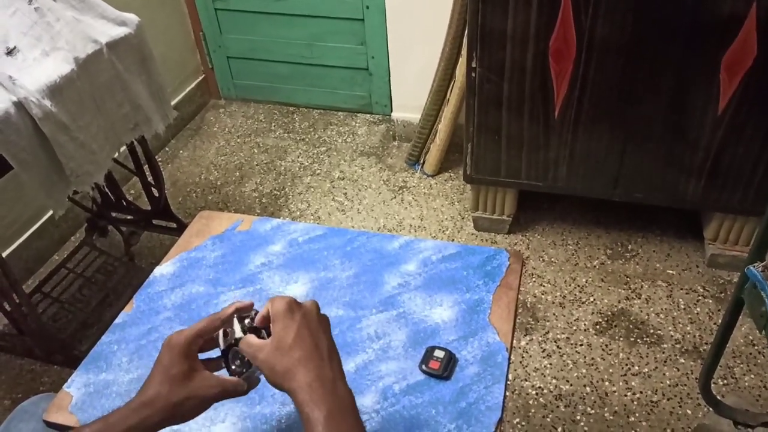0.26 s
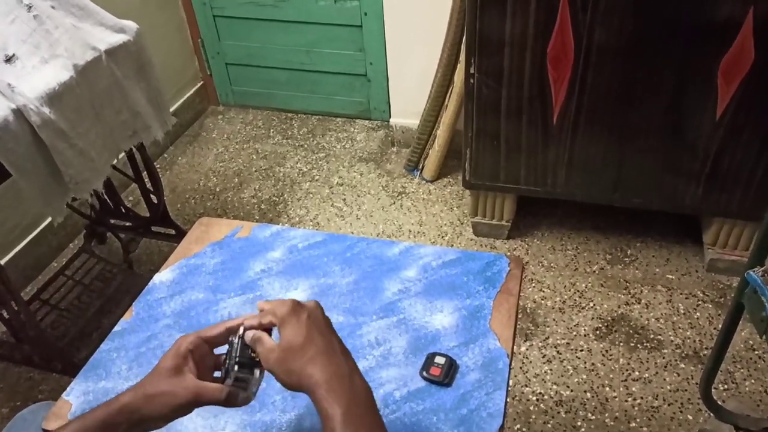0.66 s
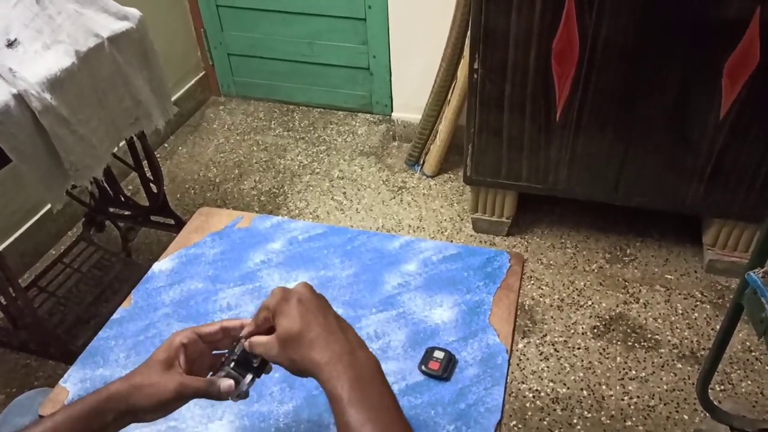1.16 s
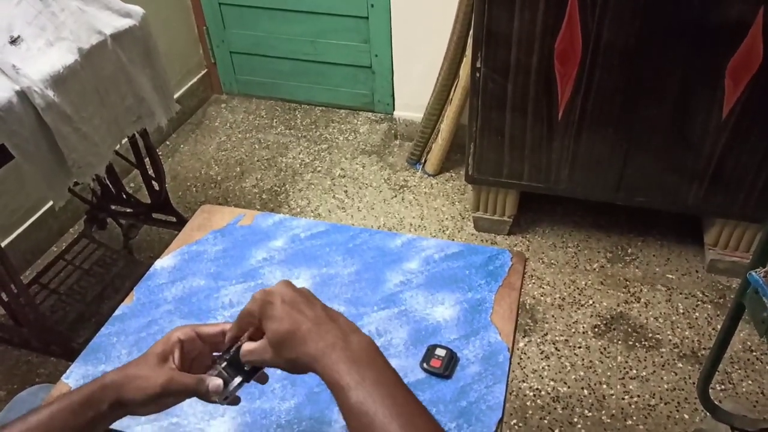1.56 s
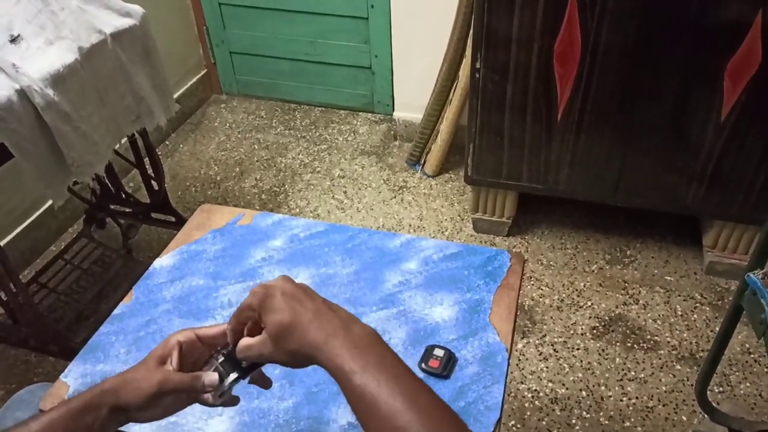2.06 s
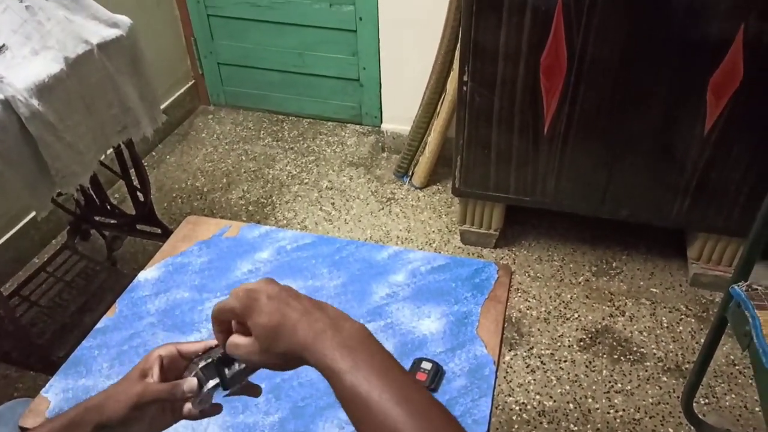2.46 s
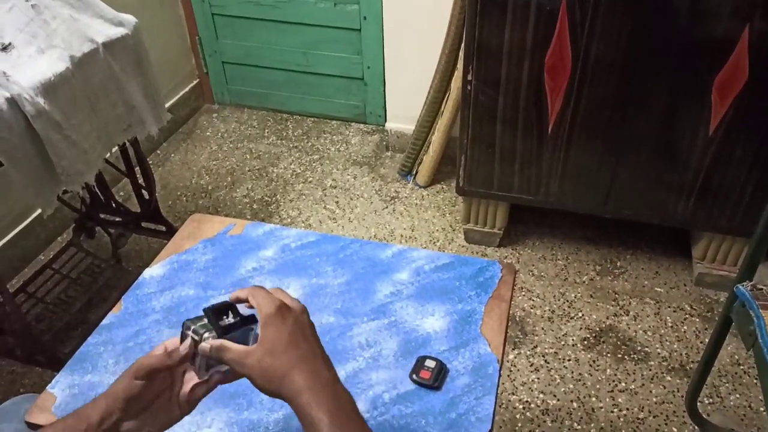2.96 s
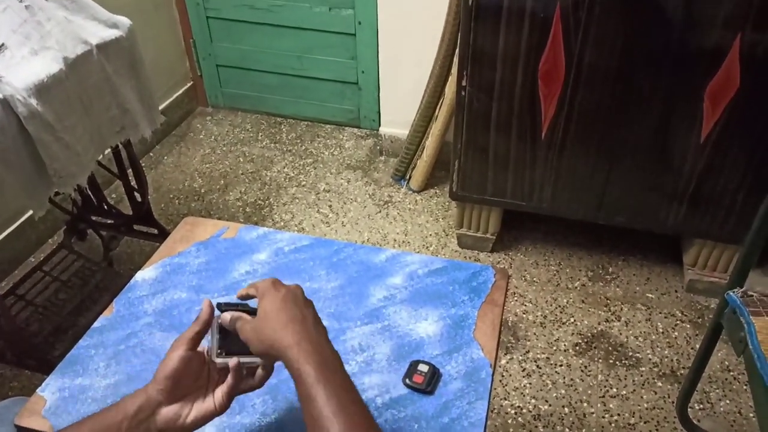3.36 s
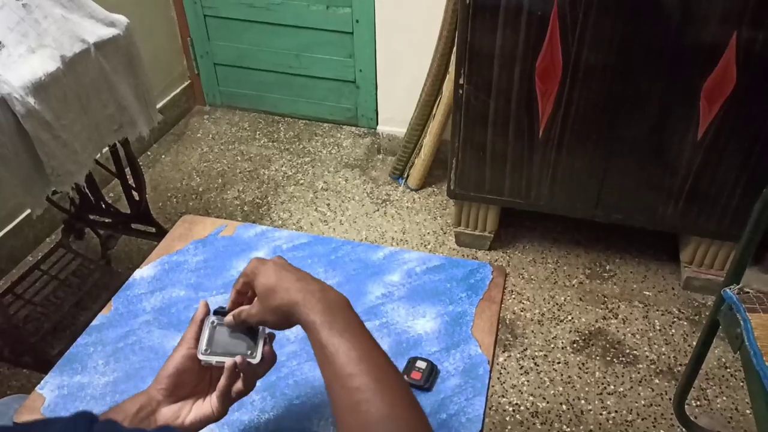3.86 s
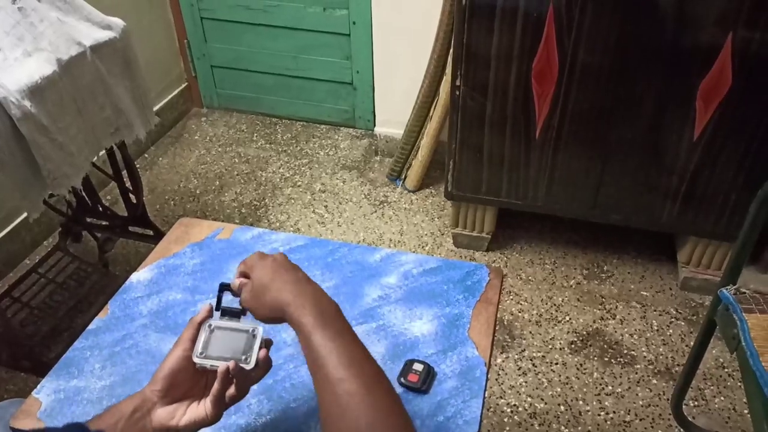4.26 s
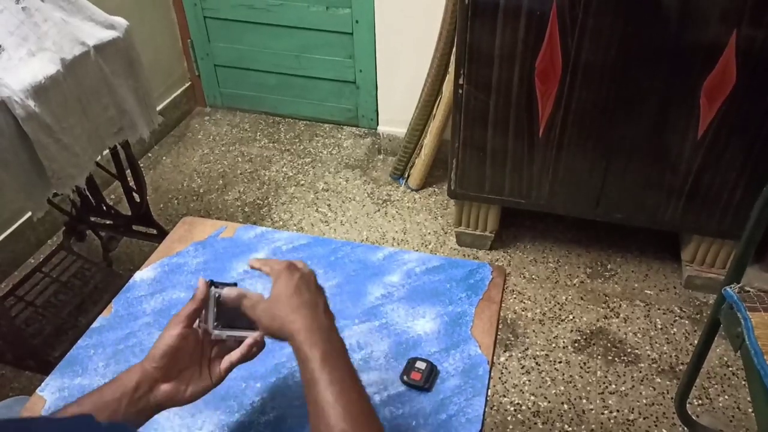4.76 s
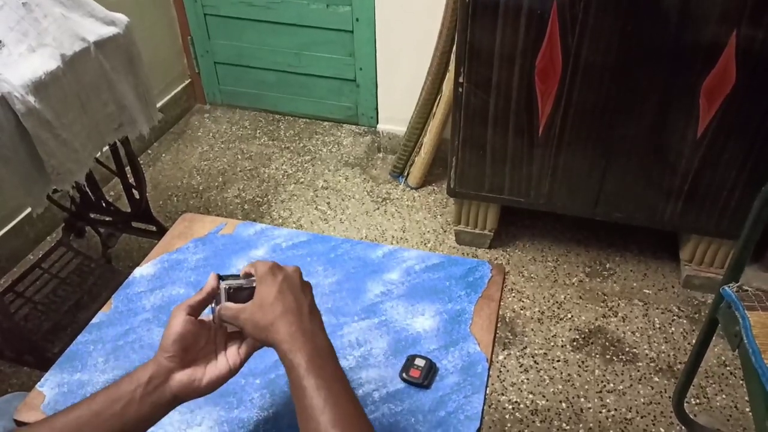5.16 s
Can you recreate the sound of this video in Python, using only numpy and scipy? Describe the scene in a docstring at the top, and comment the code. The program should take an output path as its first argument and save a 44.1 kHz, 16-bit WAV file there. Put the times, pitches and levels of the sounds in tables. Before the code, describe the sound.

Sharp snaps and soft ticks of a small plastic case being unlatched by hand, with one brief squeak, over a low room hum.

```python
"""A low room hum under microphone hiss, and almost at once the snap of a latch on a small hard plastic case.
Hands work it at arm's length: four loud snaps among soft ticks, each a crack that rings the case.
Midway comes one dull knock; later the hinge chirps faintly, then sticks and slips in a single squeak.
The bare, stone-floored room answers latch and hinge with a short bright tail."""
import sys
import numpy as np
from scipy import signal
from scipy.fft import rfft, irfft
from scipy.io import wavfile
from scipy.ndimage import uniform_filter1d

SR = 44100
rng = np.random.default_rng(int(sys.argv[2]) if len(sys.argv) > 2 else 0)


def pcm_store(signal):
    """Save signal as 16-bit PCM."""
    levels = np.round(np.clip(np.atleast_2d(signal), -1, 1) * 32767)
    wavfile.write(sys.argv[1], SR, levels.astype(np.int16).T)


N = 238140
MIC_LAG_SAMPLES = 6  # the hands are nearer the left microphone


def undb(db):
    """Decibels to amplitude."""
    return 10 ** (np.asarray(db) / 20)


def resonance_db(f, peaks):
    """Summed boost of resonances, each given as centre_hz, width_hz, boost_db."""
    return sum(db / (1 + (2 * (f - hz) / width) ** 2) for hz, width, db in peaks)


# Colour of the hum and hiss: freq_hz, density_db, stereo_likeness (0 unrelated, 1 mono)
ROOM_TONE = [(25, -35, 0.7), (45.5, -25, 0.5), (107, -3.5, 0.72), (160.7, -4.5, 0.9), (285, -12.5, 0.65),
             (426, -11, 0.58), (1090, -24, 0), (2540, -31, 0.03), (4310, -28.5, 0), (5400, -39, 0.14),
             (6620, -30.5, 0), (9000, -36, 0.64), (11880, -38.5, 0.1), (14700, -34, 0)]
# Room resonances in the hum: centre_hz, width_hz, boost_db
HUM_MODES = [(111.6, 23, 3), (138.9, 8.1, 9.5), (169, 11.5, 2.5), (186, 20, 5), (282.9, 22.4, 12)]


def hum_and_hiss(level_db=-53.5):
    """Low noise, largely shared by both microphones and lifted at the room resonances, under wide hiss."""
    f = np.maximum(np.fft.rfftfreq(N, 1 / SR), 1)
    freq_hz, density_db, likeness = np.transpose(ROOM_TONE)
    colour_db = np.interp(np.log(f), np.log(freq_hz), density_db) + resonance_db(f, HUM_MODES)
    likeness = np.interp(np.log(f), np.log(freq_hz), likeness)
    noise = rfft(rng.standard_normal((2, N)))
    mid, side = noise * undb(colour_db) * np.sqrt([1 + likeness, 1 - likeness])
    bed = irfft([mid + side, mid - side], N)
    return bed * undb(level_db) / bed.std()


def ring_db(f, centre_hz, boost_db, peak_width_hz, hump_width_hz, peak_share=0.41):
    """One ring of the case: a narrow peak on a broad hump of neighbouring modes."""
    peak = (centre_hz, peak_width_hz, peak_share * boost_db)
    hump = (centre_hz, hump_width_hz, (1 - peak_share) * boost_db)
    return resonance_db(f, [peak, hump])


def crack(colour_db, delay_s):
    """A click of the given colour; the catch lets go unevenly, so each frequency has its own delay."""
    cepstrum = irfft(np.log(undb(colour_db)))
    cepstrum[1:1024] *= 2  # minimum phase: the attack comes first, the ring after
    cepstrum[1025:] = 0
    phase_lag = 2 * np.pi * np.cumsum(delay_s) * SR / 2048
    return irfft(np.exp(rfft(cepstrum) - 1j * phase_lag))[:1024]


# Colour of a hit, from fingernail to finger pad: freq_hz, hard_db, soft_db
CONTACT_COLOUR = [(480, -34.5, 19), (758, -32, 26), (1200, -20, 20), (2030, -8.5, 14.5), (3520, 5, 12.5),
                  (4865, 4.5, 6), (6300, 14, 6), (7930, 15, 5.5), (11400, 4, -6)]
# Modes the case rings with on every hit: centre_hz, width_hz, boost_db
CASE_MODES = [(1748, 100, 5.5), (4623, 490, 4.5), (6340, 610, 7.5), (7370, 220, 4), (7960, 230, 4.5)]
# Snaps and ticks; the grip shifts the rings of the case's hollow and wall: start_s, level_db,
# softness (0 nail, 1 pad), treble_db, hollow_hz, hollow_db, wall_hz, wall_db, pan_left_db, send_db
LATCH_HITS = [(0.0751, -11.5, 0.28, -1, 1327, 14, 3810, 12.7, -4.5, 0.5),
              (0.612, -12, 0.2, 2.5, 1278, 25, 3730, 9.3, 0, -7.5),
              (0.9556, -45, 0.57, 1, 1050, 3, 3540, 19.3, -1.5, 0.5),
              (1.01, -50.5, 0.48, 5, 1360, 5, 3400, 11, -2.0, 0),
              (1.2032, -41, 0.49, 0, 1010, 2.6, 3700, 13, -7, -0.5),
              (1.2201, -55.5, 0.64, -7, 1260, 5, 3710, 27, -7, 2.5),
              (1.5084, -54, 0, -8, 1370, 9, 4390, 5, 0.0, 0.0),
              (1.935, -40, 0.44, 5, 1330, 9, 4060, 15.4, 1, -7.5),
              (2.1805, -38, 0.63, -20, 1340, 12, 3710, 17.8, 2, -4.5),
              (2.382, -6.5, 0.006, 0.0, 1340, 11, 4820, 6.4, -2.5, -3.5),
              (2.5339, -30.5, 0.82, -2, 1310, 9.9, 3500, 8.7, -2, -2.5),
              (2.5739, -37, 0.59, 10, 1490, 9, 4180, 14, -3, -1.5),
              (2.864, -59.5, .7, -0.5, 1346, 9.4, 3220, 23, -1, -1.5),
              (3.1762, -50, 0.79, -2, 1120, 9, 3640, 5, 10, -3),
              (3.2691, -51.5, 1, 2, 920, 14.3, 4160, 6.5, -2, -3),
              (3.6401, -52.5, 1, 2, 890, 10, 3500, 15, 3, -5.5),
              (3.68, -57, 0.63, 0.0, 1130, 4, 3970, 23, -7.5, 1),
              (3.8114, -46.5, .9, -5.5, 1110, 12, 3400, 8.8, 5, 1.5),
              (3.932, -42, 0.88, 3, 800, 11.8, 3150, 2.6, 1.0, -5),
              (4.0792, -49.5, 1, -1, 1380, 8.7, 4400, 7.3, -1, -3.5),
              (4.2029, -36, 0.75, -3, 1230, 13.5, 3600, 5.6, 1, 2),
              (4.4933, -9, 0.34, 7.5, 1095, 23.3, 3440, 8.1, -6.5, -2),
              (4.5488, -33, 0.6, -16, 924, 15.6, 4540, 19.3, 23, -1),
              (4.9874, -32, 0.74, -10, 1440, 16.6, 4620, 13.4, -2, -3)]


def latch(treble_shelf_hz=10000, small_modes_db=1.5):
    """Each hit cracks and rings the case, duller for a softer contact; returns direct sound and send."""
    f = np.maximum(np.fft.rfftfreq(2048, 1 / SR), 1)
    contact_hz, hard_db, soft_db = np.transpose(CONTACT_COLOUR)
    bass_loss_db = 10 * np.log10(1 + (360 / f) ** 6.9)  # a small case radiates no bass
    body_db = resonance_db(f, CASE_MODES) - bass_loss_db
    shelf = 1 / (1 + (treble_shelf_hz / f) ** 10)
    smears = uniform_filter1d(rng.standard_normal((len(LATCH_HITS), len(f))), size=25)
    ripples = uniform_filter1d(rng.standard_normal(smears.shape), size=6)
    ripples = uniform_filter1d(ripples, size=6)  # the many small modes each hit wakes by chance
    direct, send = np.zeros((2, N)), np.zeros(N)
    for hit, smear, ripple in zip(LATCH_HITS, smears, ripples / ripples.std()):
        start_s, level_db, softness, treble_db = hit[:4]
        hollow_hz, hollow_db, wall_hz, wall_db, pan_left_db, send_db = hit[4:]
        colour_db = np.interp(np.log(f), np.log(contact_hz), hard_db + softness * (soft_db - hard_db))
        colour_db += body_db + treble_db * shelf + small_modes_db * ripple
        colour_db += ring_db(f, hollow_hz, hollow_db, peak_width_hz=83, hump_width_hz=590)
        colour_db += ring_db(f, wall_hz, wall_db, peak_width_hz=200, hump_width_hz=1250)
        click = undb(level_db) * crack(colour_db, delay_s=0.001026 + 0.0023 * smear)
        add(direct, start_s, click * undb([[pan_left_db / 2], [-pan_left_db / 2]]))
        add(send, start_s, click * undb(send_db))
    return direct, send


def add(track, start_s, sound):
    """Mix a sound in at start_s."""
    i = int(start_s * SR)
    track[..., i:i + sound.shape[-1]] += sound[..., :N - i]


# Bands of the reverb tail: centre_hz, t60_s, gain_db
TAIL_BANDS = [(502, 0.44, 10), (1000, 0.29, 3), (2160, 0.39, 7), (4120, 0.36, 4.5), (7200, 0.33, 3),
              (13100, 0.29, 4)]
# Early reflections off hands, mat, floor and furniture: delay_s, level_db
REFLECTIONS = [(.0018, -6.5), (.0075, -9), (0.0103, -7), (0.012, -3)]


def room_reverb(send, tail_db=-27, wall_delay_s=0.0034, build_s=0.0018):
    """Early reflections and a dense tail that builds as the walls answer; each band has its own decay."""
    t = np.arange(SR // 2) / SR
    response = np.zeros((2, len(t)))
    centres_hz = np.array(TAIL_BANDS)[:, 0]
    edges_hz = np.r_[100, np.sqrt(centres_hz[1:] * centres_hz[:-1]), 17000]
    for (_, t60_s, gain_db), low_hz, high_hz in zip(TAIL_BANDS, edges_hz, edges_hz[1:]):
        bandpass = signal.butter(2, (low_hz, high_hz), "band", fs=SR, output="sos")
        band = signal.sosfilt(bandpass, rng.standard_normal(response.shape))
        response += undb(gain_db + tail_db) * band * np.exp(-np.log(1000) * t / t60_s)
    response *= 1 - np.exp(-np.clip(t - wall_delay_s, 0, None) / build_s)
    skews = rng.integers(0, 12, (len(REFLECTIONS), 2)) + [0, MIC_LAG_SAMPLES]  # samples, left and right
    for (delay_s, level_db), skew in zip(REFLECTIONS, skews):
        response[[0, 1], int(delay_s * SR) + skew] += undb(level_db)
    return signal.fftconvolve(send[None], response, axes=1)[:, :N]


# One dull knock: start_s, pitch_hz, t60_s, level_db
KNOCK = [(2.556, 217, 0.14, -41.5)]


def knock(attack_s=0.0011):
    """A single low mode that swells for a few milliseconds and dies."""
    start_s, pitch_hz, t60_s, level_db = KNOCK[0]
    t = np.clip(np.arange(N) / SR - start_s, 0, None)
    envelope = (1 - np.exp(-t / attack_s)) * np.exp(-np.log(1000) * t / t60_s)
    return undb(level_db) * envelope * np.sin(2 * np.pi * pitch_hz * t)


# Thin chirps of the hinge: start_s, end_s, from_hz, to_hz, level_db
HINGE_CHIRPS = [(3.214, 3.26, 12900, 15200, -79), (3.295, 3.345, 13100, 14300, -78),
                (3.345, 3.385, 14100, 15000, -73)]


def hinge_chirps():
    """The hinge whistles faintly in short rising glides."""
    out = np.zeros(N)
    for start_s, end_s, from_hz, to_hz, level_db in HINGE_CHIRPS:
        glide_hz = np.linspace(from_hz, to_hz, int((end_s - start_s) * SR))
        tone = np.sqrt(2) * np.sin(2 * np.pi * np.cumsum(glide_hz) / SR)
        add(out, start_s, undb(level_db) * signal.windows.tukey(len(tone), 0.3) * tone)
    return out


# The squeak, one row per catch of the hinge: start_s, length_s, pitch_hz, level_db
HINGE_CATCHES = [(4.439, .014, 6850, -57.5), (4.449, 0.015, 6835, -28.5), (4.464, 0.015, 6820, -29),
                 (4.4753, 0.011, 6880, -31), (4.487, 0.011, 7050, -39)]


def hinge_squeak(grab_s=0.0043, slip_db_per_s=-380, release_s=0.0023, octave_db=-21.5):
    """Stick-slip tone with a rough octave: each catch swells, fades while it slips, then stops."""
    out = np.zeros(N)
    t = np.arange(SR // 20) / SR
    slip_db = slip_db_per_s * np.clip(t - grab_s, 0, None)
    wobbles = uniform_filter1d(rng.standard_normal((len(HINGE_CATCHES), len(t))), size=40)
    for (start_s, length_s, pitch_hz, level_db), wobble in zip(HINGE_CATCHES, wobbles):
        envelope = np.clip(t / grab_s, 0, 1) ** 2 * np.clip((length_s - t) / release_s, 0, 1)
        phase = 2 * np.pi * pitch_hz * t
        tone = np.sin(phase + 0.67 * wobble) + undb(octave_db) * np.sin(2 * phase + 4.0 * wobble)
        add(out, start_s, np.sqrt(2) * undb(level_db + slip_db) * envelope * tone)
    return out


def treble_notch(sound, depth_db, band_hz=(8700, 11450)):
    """A steep band-stop that scoops a gap out of the treble."""
    return signal.sosfilt(signal.ellip(6, 0.3, depth_db, band_hz, "bandstop", fs=SR, output="sos"), sound)


def scene(hinge_send_db=-8.5):
    """Mix the case, its reverb and the room tone, each with its own depth of treble notch."""
    direct, latch_send = latch()
    hinge = hinge_chirps() + hinge_squeak()
    direct += knock() + hinge * undb([[-1.5], [1.5]])  # the hinge is louder on the right
    direct[1] = np.roll(direct[1], MIC_LAG_SAMPLES)
    reverb = room_reverb(latch_send + undb(hinge_send_db) * hinge)
    return (treble_notch(direct, depth_db=10)
            + treble_notch(reverb, depth_db=42)
            + treble_notch(hum_and_hiss(), depth_db=21))


def record(dry, cutoff_hz=15350):
    """A steep low-pass takes the very top off the mix."""
    return signal.sosfilt(signal.ellip(8, 0.2, 70, cutoff_hz, fs=SR, output="sos"), dry)


dry = scene()
out = record(dry)
pcm_store(out)
```